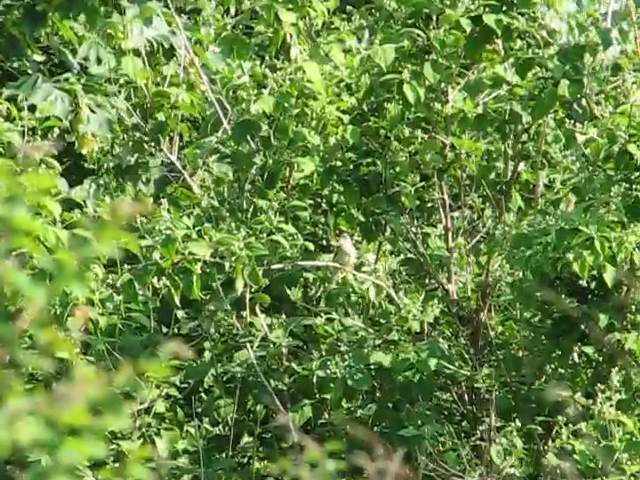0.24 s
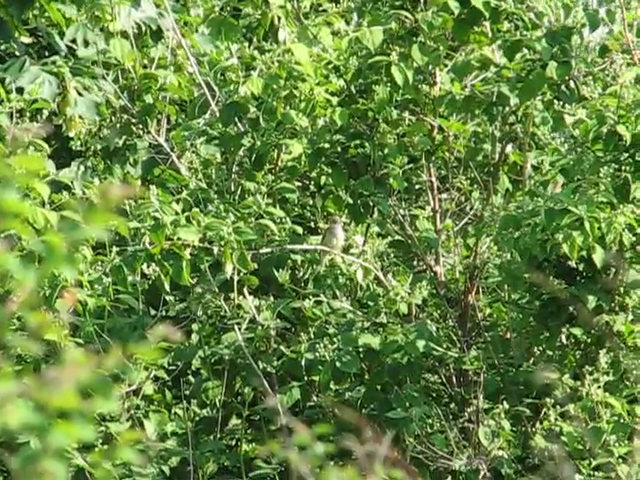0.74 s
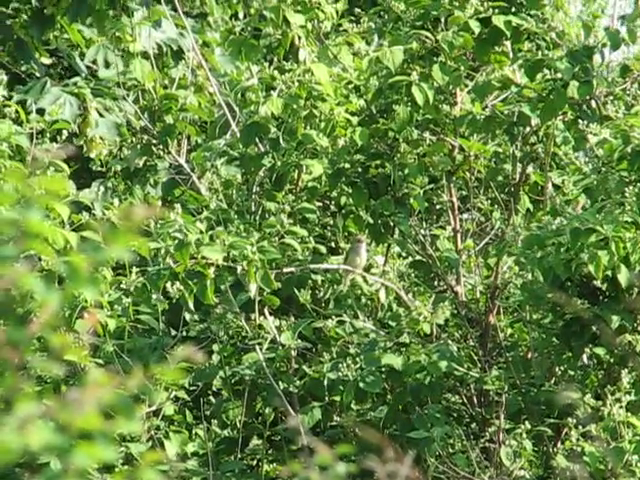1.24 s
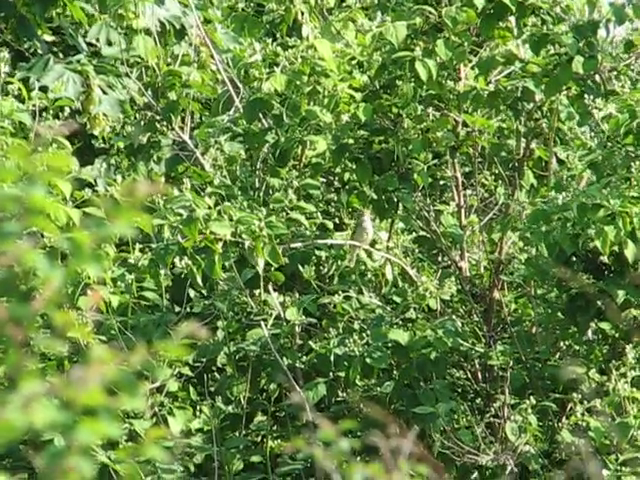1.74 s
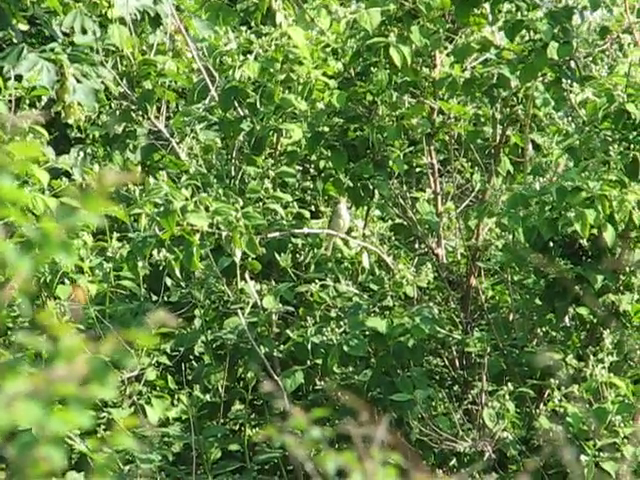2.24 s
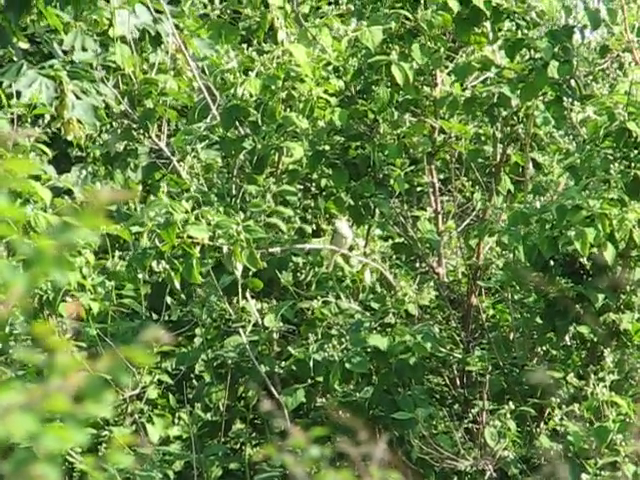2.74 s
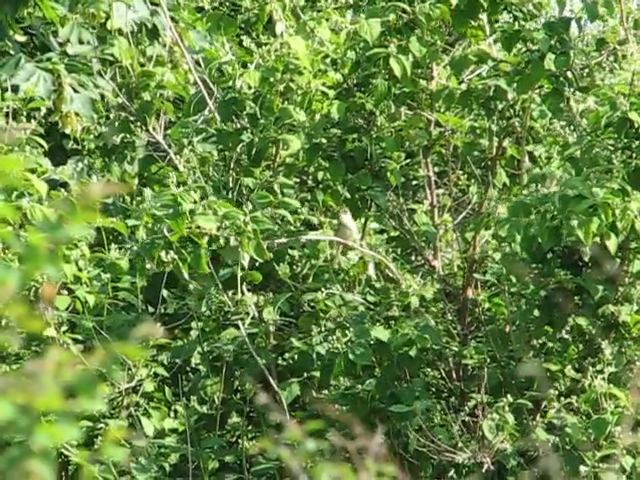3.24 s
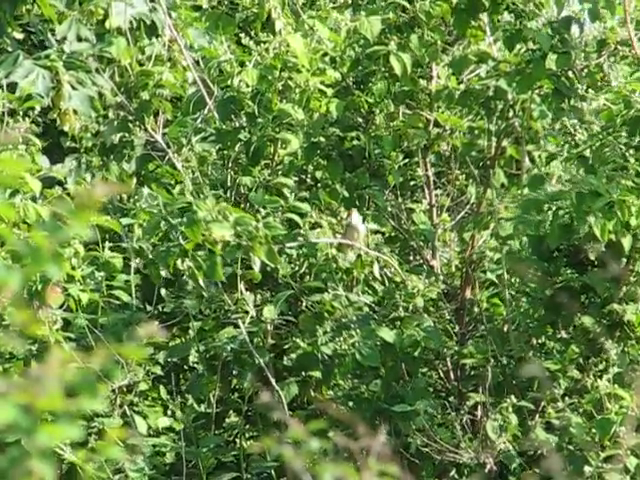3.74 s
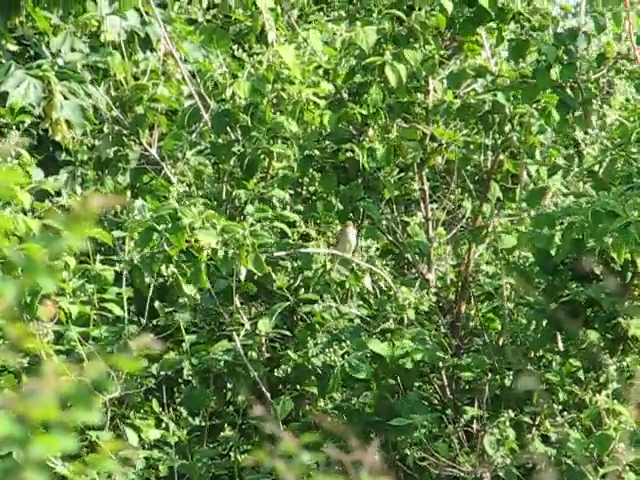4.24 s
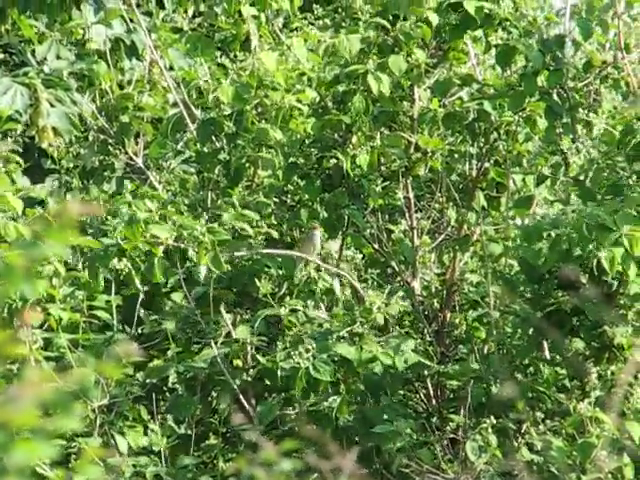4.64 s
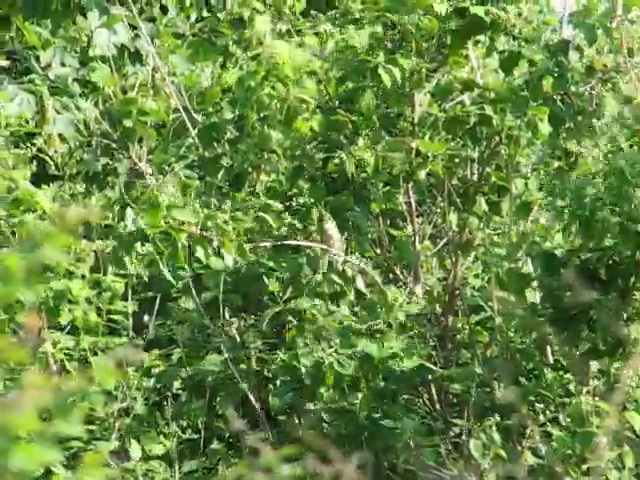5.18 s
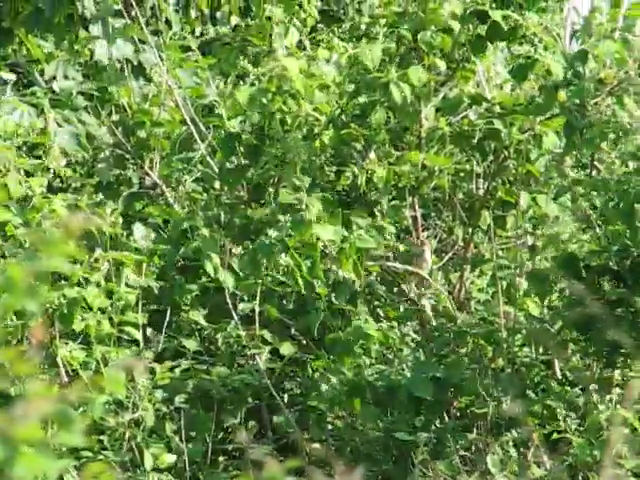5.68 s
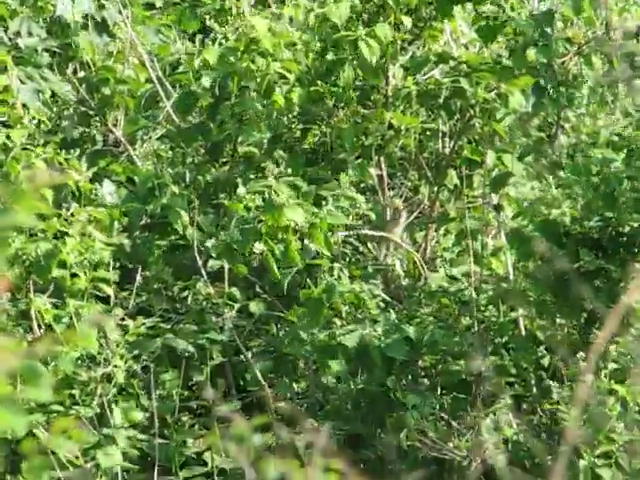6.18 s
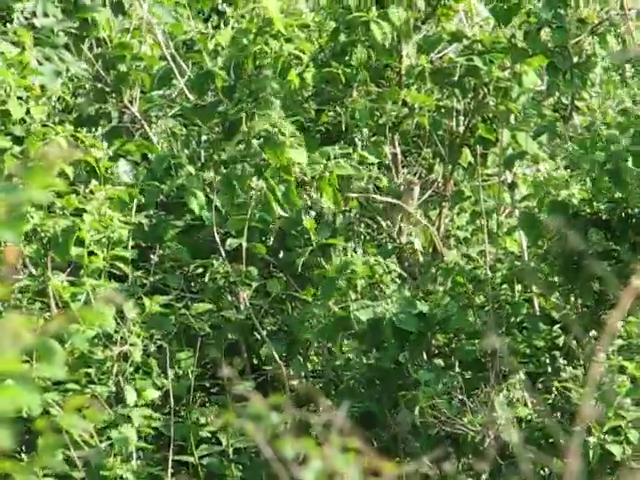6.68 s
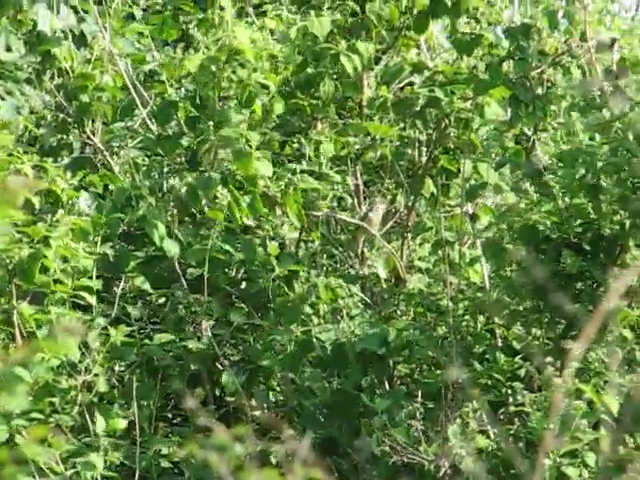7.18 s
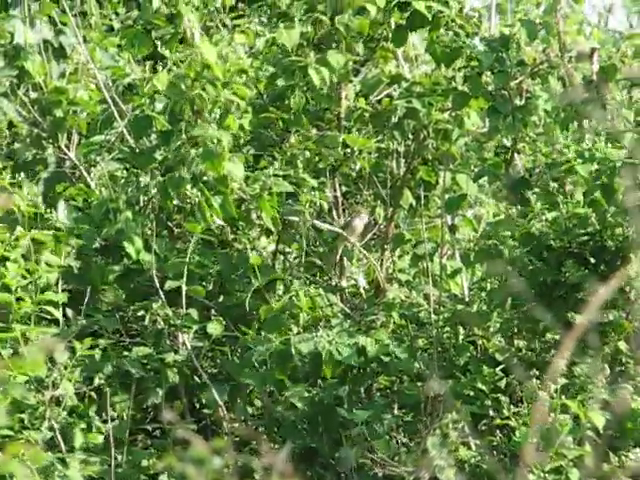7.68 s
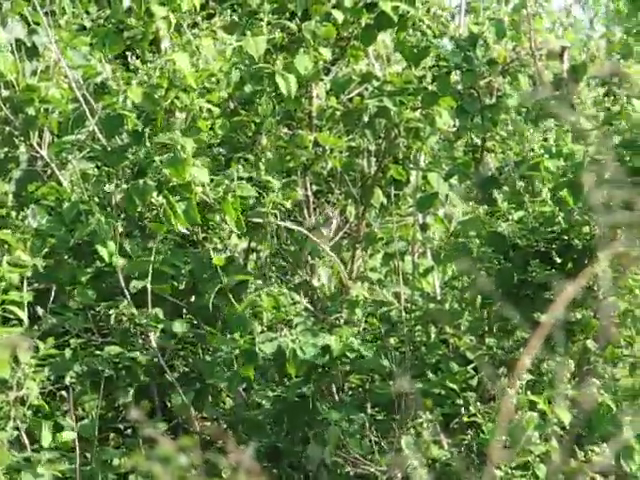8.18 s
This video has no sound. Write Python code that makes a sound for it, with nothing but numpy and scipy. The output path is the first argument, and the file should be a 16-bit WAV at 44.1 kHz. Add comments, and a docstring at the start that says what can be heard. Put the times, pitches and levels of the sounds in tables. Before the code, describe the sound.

In sunny shrubbery a small warbler sings close and clear, a hurried chain of whistled chips, then nasal chucks, sharp ticks, mews and buzzes, then repeated upswept hooks running into rattling trills, ending with hisses, wobbling whistles and piercing high notes. Another bird whistles faintly through leafy echoes. An open-air stereo microphone catches steady hush, low wind rumble, mostly on the right at first, and a thin electronic camera whine.

```python
"""A steady outdoor hush and a thin camera whine run throughout, with wind buffeting two microphone ports.
A near warbler opens with whistled chips and slurs while a second bird whistles farther off, mostly echo.
Then come nasal chucks, ticks, mews, buzzes, hooked glides, warbles and trills, and later hisses.
Whistles are jittered sines; nasal and rough notes are pulse trains and puffs through a moving throat
resonance. Random echoes stand for leaves; wind and hush are shaped noise; eddies are single pulses."""
import sys
import numpy as np
from scipy import signal
from scipy.fft import rfft, irfft
from scipy.io import wavfile
from scipy.ndimage import uniform_filter1d

SR = 44100
rng = np.random.default_rng(int(sys.argv[2]) if len(sys.argv) > 2 else 0)


def log_audio(samples):
    """Write samples as a 16-bit WAV file to the path given in sys.argv[1]."""
    # one column per channel
    frames = np.atleast_2d(samples).T
    # limit to full scale, then quantise
    limited = np.clip(frames, -1, 1)
    pcm = np.round(limited * 32767).astype(np.int16)
    wavfile.write(sys.argv[1], SR, pcm)


N = 371322
TIME = np.arange(N) / SR

# Background level over time. Each row: time in seconds, gain in dB.
BACKGROUND_LEVEL = [(0, 2), (1.4, 2.5), (1.65, -1), (2, 4), (3.65, 2.5), (3.9, -9), (4.5, -9.5),
                    (4.85, -16), (5.2, -8), (5.6, -2.5), (6, 2.5), (8.42, 3.5)]


def amp(db):
    """Decibels to gain."""
    return 10 ** (np.asarray(db) / 20)


def evened(x):
    """Scales to rms 1."""
    return x / np.sqrt(np.mean(x ** 2) + 1e-20)


def curve(rows, t):
    """Joins rows of (s, value) by straight lines."""
    return np.interp(t, *np.transpose(rows))


def spectrum(points, hz):
    """Joins rows of (Hz, value) on a log-frequency axis."""
    f, value = np.transpose(points)
    return np.interp(np.log(hz + 1), np.log(f), value)


def ease(u):
    """A smooth step from 0 to 1."""
    return np.sin(np.pi / 2 * np.clip(u, 0, 1)) ** 2


def wander(count, hz):
    """Smooth noise of about rms 1: Gaussian low-pass, down to 1/e in amplitude at hz."""
    f = np.fft.rfftfreq(count + 4096, 1 / SR)
    noise = rfft(rng.standard_normal(2 * len(f) - 2))
    return evened(irfft(noise * np.exp(-(f / hz) ** 2)))[:count]


def frames():
    """Times, frequencies and random short-time spectra (frames, bins) of a white noise."""
    hz, t, z = signal.stft(rng.standard_normal(N), SR, nperseg=1024, noverlap=768)
    return t[:, None], hz, z.T


def to_sound(z):
    """Short-time spectra back to a waveform."""
    return signal.istft(z.T, nperseg=1024, noverlap=768)[1][:N]


def resonate(x, hz, width):
    """A moving resonance: shift down to zero, smooth twice, shift back."""
    turn = np.exp(2j * np.pi * np.cumsum(hz) / SR)
    r = np.exp(-np.pi * width / SR)
    return (turn * signal.lfilter([(1 - r) ** 2], [1, -2 * r, r * r], x / turn)).real


def span(s, length):
    """Sample times of a note, and its progress from 0 to 1."""
    u = np.linspace(0, 1, round(length * SR))
    return s + u * length, u


def envelope(t, attack_s, release_s, depth_db):
    """Attack, hold and release of a note, in dB below its full level."""
    nearest_edge = np.minimum((t - t[0]) / attack_s, (t[-1] - t) / release_s)
    return depth_db * (np.clip(nearest_edge, 0, 1) - 1)


def gesture(rows):
    """Sample times of one note and its controls, with the corners rounded."""
    s, *columns = np.transpose(rows)
    t = np.arange(s.min() - .001, s.max() + .001, 1 / SR)
    lines = (np.interp(t, np.sort(s), c) for c in columns)
    return t, *(uniform_filter1d(line, size=130, mode="nearest") for line in lines)


def add(mix, t, sound):
    """Lays a note into the mix with short soft edges."""
    edge = np.clip(np.minimum(t - t[0], t[-1] - t) / 0.00033, 0, 1)
    part = mix[max(round(t[0] * SR), 0):][:len(t)]
    part += (sound * np.sin(np.pi / 2 * edge) ** 2)[:len(part)]


def whistle(hz, overtone_db=-27, jitter=0.014):
    """A nearly pure tone from the syrinx, with a weak octave."""
    phase = 2 * np.pi * np.cumsum(hz * (1 + jitter * wander(len(hz), 630))) / SR
    return evened(np.sin(phase) + amp(overtone_db) * np.sin(2 * phase))


def whistles(notes, overtone_db, rising_db=13, break_per_s=85):
    """Clean glides: quick rises bring out the octave, and the tone breaks where it leaps down."""
    out = np.zeros(N)
    for t, hz, db in notes:
        glide = np.gradient(np.log(hz), t)
        held = 1 / (1 + (np.maximum(-glide, 0) / break_per_s) ** 8)
        octave_db = overtone_db + rising_db * np.clip(glide / 35, 0, 1)
        add(out, t, amp(db) * held * whistle(hz, overtone_db=octave_db))
    return out


def voice(hz, throat_hz, width, jitter, rough, count, leak_db=-40):
    """Jittered syrinx pulses and puffs of air; the throat picks out the nearest overtones."""
    k = np.arange(1, count + 1)[:, None]
    phase = 2 * np.pi * np.cumsum(hz * (1 + jitter * wander(len(hz), 810))) / SR
    gains = 1 / (1 + (np.log(k * hz / throat_hz) / width) ** 2)
    # partials below the resonance leak out
    gains = gains + amp(leak_db) / (1 + (k * hz / throat_hz) ** 8)
    # a small beak radiates no bass
    gains = gains / np.sqrt(1 + (1950 / (k * hz)) ** 12)
    # phases quadratic in k make each pulse a short chirp
    pulses = (gains * np.cos(k * phase + 1.3 * k ** 2)).sum(0)
    pulses = pulses / np.sqrt((gains ** 2).sum(0) / 2)
    air = (1 + np.cos(phase)) * rng.standard_normal(len(hz))
    puffs = evened(resonate(air, throat_hz, 2 * width * throat_hz.mean()))
    rough = np.clip(rough, 0, 1)
    return np.sqrt(1 - rough) * pulses + np.sqrt(rough) * puffs


def voiced(notes, width, jitter, rough, count, leak_db):
    """Notes in which pitch and throat move separately."""
    out = np.zeros(N)
    for t, hz, throat_hz, db in notes:
        add(out, t, amp(db) * voice(hz, throat_hz, width, jitter, rough, count, leak_db))
    return out


def rasps(notes, pulse_hz, width, jitter, rough, count, leak_db):
    """Rough pulse trains whose rate arches a little while the throat moves."""
    out = np.zeros(N)
    for t, throat_hz, db in notes:
        arch = 1 - 0.13 * np.linspace(-1, 1, len(t)) ** 2
        add(out, t, amp(db) * voice(pulse_hz * arch, throat_hz, width, jitter, rough, count, leak_db))
    return out


def whine_high(hz=11800, db=-71, drift_hz=90):
    """A faint, wavering top note of the camera's whine."""
    pitch_hz = hz + drift_hz * wander(N, 2) + 120 * wander(N, 300)
    return amp(db + 3 * wander(N, 2)) * np.sin(2 * np.pi * np.cumsum(pitch_hz) / SR)


def background(hush_db=-38.0):
    """Outdoor hush, alike on both ports only in the bass, and whine: low notes lean right, the top left."""
    # Each row: frequency in Hz, relative spectral level in dB.
    hush_shape = [(30, 0), (150, 5), (500, 0), (950, 2.5), (1500, -2), (2200, -6), (4500, -9.5), (8000, -9),
                  (9300, -23), (12500, -24), (15700, -29.5)]
    # Each row: frequency in Hz, left-right likeness from 0 to 1.
    likeness = [(100, 1), (900, 0.84), (2000, 0.19), (5000, 0.044), (12000, 0.033)]
    # Each row: frequency in Hz, relative level in dB.
    whine_notes = [(7854, -57.5), (7881, -79), (7913, -82), (8253, -75), (8280, -60.5), (8312, -80)]
    (_, hz, left), (_, _, other) = frames(), frames()
    same = np.clip(spectrum(likeness, hz), -1, 1)
    ports = left, same * left + np.sqrt(1 - same ** 2) * other
    hush = evened(np.array([to_sound(z * amp(spectrum(hush_shape, hz))) for z in ports]))
    hush = hush * amp(hush_db + .5 * wander(N, 12.0))
    whine = np.zeros(N)
    for note_hz, db in whine_notes:
        whine += amp(db) * np.sin(2 * np.pi * np.cumsum(note_hz + 4 * wander(N, 44)) / SR)
    total = hush + whine * amp([[-2], [6]]) + whine_high() * amp([[2], [-4]])
    return total * amp(curve(BACKGROUND_LEVEL, TIME))


def blowing(breeze, side):
    """Relative wind level in dB on one port: the breeze, lifted by each passing gust."""
    # Each row: centre in seconds, 1/e half length in seconds, lift on the left in dB, on the right in dB.
    gusts = [(0.339, 0.028, -5, 12.5), (0.452, 0.028, -1, 8.5), (1.651, 0.019, 4, 7), (1.927, .04, 3, 1),
             (2.24, 0.022, 2, 6), (2.88, 0.019, 15, -4), (3.478, .03, 12, 6.5), (3.667, 0.059, 8, 2.5),
             (4.571, 0.023, 0, 5.5), (5.084, 0.069, 11, 6.5), (5.309, 0.048, 11.5, 2.5),
             (5.623, 0.009, 12.5, 2), (5.849, 0.021, 7.5, 8.5), (5.91, 0.023, 2, 11.5),
             (6.373, 0.024, 23, 3), (6.485, 0.015, 2, 12.5), (6.564, .02, 10, 4.5),
             (6.71, 0.045, -1.5, 9.5), (8.285, 0.063, -5, 10.5)]
    level = curve(breeze, TIME)
    for s, half_s, left_db, right_db in gusts:
        lift_db = right_db if side == "right" else left_db
        level = level + lift_db * np.exp(-((TIME - s) / half_s) ** 2)
    return level


def wind(level, corner_hz, low_hz, slope, brighten_db=62, lumps_db=3.5):
    """Turbulence on one port: harder gusts hold smaller eddies and reach higher."""
    t, hz, z = frames()
    above_background_db = np.interp(t, TIME, level) - curve(BACKGROUND_LEVEL, t)
    corner = corner_hz * 10 ** ((above_background_db + 15.0) / brighten_db)
    bass_cut = hz / np.hypot(hz, low_hz) * hz / np.hypot(hz, 24)
    shape = bass_cut / (1 + (hz / corner) ** 3) ** (slope / 6)
    rumble = evened(to_sound(z * shape / np.linalg.norm(shape, axis=1, keepdims=True)))
    rumble /= np.sqrt(uniform_filter1d(rumble ** 2, size=3500))
    return amp(level) * evened(rumble * amp(lumps_db * wander(N, 56.4)))


def wind_on_ports():
    """Separate turbulence on the left and right port."""
    # Breeze on each port. Each row: time in seconds, relative level in dB.
    breeze_left = [(0, -43), (1.4, -38.5), (1.9, -35), (2.7, -40), (3.6, -31.5), (3.9, -35), (4.55, -26),
                   (4.95, -39), (5.35, -22.5), (5.98, -21.5), (6.25, -37), (7.95, -50), (8.12, -25),
                   (8.42, -47)]
    breeze_right = [(0, -28), (1.03, -25.5), (1.45, -13.5), (2.0, -19.5), (2.6, -28.5), (3.0, -17),
                    (3.6, -18), (3.85, -10), (4.8, -13.5), (4.94, -25), (5.25, -25), (5.45, -31.5),
                    (5.72, -16), (6.24, -44), (6.68, -23.5), (7.52, -21), (7.87, -33.5), (8.42, -31.5)]
    left = wind(blowing(breeze_left, "left"), corner_hz=152, low_hz=35, slope=4.5)
    right = wind(blowing(breeze_right, "right"), corner_hz=197.6, low_hz=81.4, slope=5.59)
    return np.array([amp(0.2) * left, amp(0.38) * right])


def chip(s, climb_s, shoulder_s, turn_s, top_hz, db, tail_db, shoulder=.89,
         onset_db=-14, turn_db=-6, break_db=-10, fade_db=-7):
    """The pitch climbs, rounds its top, then breaks and leaps down to a falling tail."""
    start_hz, tail_hz, end_hz = 2600, 2700, 2003
    leap_s, tail_s = 0.00454, 0.015
    leap = s + turn_s
    tail = leap + leap_s
    return gesture([(s - shoulder_s - climb_s, start_hz, db + onset_db),
                    (s - shoulder_s, shoulder * top_hz, db),
                    (s, top_hz, db),
                    (leap, shoulder * top_hz, db + turn_db),
                    ((leap + tail) / 2, start_hz, tail_db + break_db),
                    (tail, tail_hz, tail_db),
                    (tail + tail_s, end_hz, tail_db + fade_db)])


def chips():
    """Whistled rises that break into a low tail."""
    # Each row: time of the top, climb, shoulder and turn in seconds, top pitch in Hz,
    # relative level in dB, relative tail level in dB.
    rows = [(0.012, .006, 0.0041, 0.0033, 4600, -39.5, -47),
            (0.218, 0.0045, .003, 0.0059, 3710, -33.5, -47), (0.757, .006, 0.0035, 0.0082, 4960, -32, -30),
            (0.852, 0.0062, 0.0036, 0.0073, 4370, -28, -33),
            (1.174, 0.0065, .005, .007, 4370, -29.5, -30.5),
            (1.264, 0.0075, .006, 0.0071, 4590, -28, -32.5),
            (1.458, 0.0083, 0.0067, 0.0047, 4460, -28.5, -35.5),
            (1.537, 0.0064, 0.0092, 0.0063, 4440, -28.5, -32),
            (1.725, 0.0052, .015, 0.011, 4350, -31.5, -35.5), (1.812, .013, 0.0088, .006, 4260, -26, -32.5),
            (1.906, .009, 0.0058, 0.0072, 4450, -23, -30), (2.013, .010, .005, 0.0077, 4400, -23.5, -36),
            (3.416, .008, 0.0074, .008, 4500, -25.5, -34.5), (3.864, .005, 0.0026, 0.004, 3790, -32.5, -60)]
    return whistles([chip(*row) for row in rows], overtone_db=-27)


def slur(s, length, start_hz, middle_hz, end_hz, db, fade_db):
    """One smooth bend of pitch; its ends lie fade_db below its middle."""
    t, u = span(s, length)
    off = (2 * u - 1) ** 2
    bend_hz = ((start_hz + end_hz) / 2 - middle_hz) * off
    return t, middle_hz + (end_hz - start_hz) * (u - .5) + bend_hz, db - fade_db * off


def shrubbery(x, t60, delay_s):
    """Leaves and twigs return many weak echoes, different at each port."""
    t = TIME[:SR // 2]
    strengths = rng.standard_normal((2, len(t)))
    present = rng.random((2, len(t))) < .1
    taps = strengths * present * (t > delay_s) * amp(-60 * t / t60)
    taps = taps / np.linalg.norm(taps, axis=1, keepdims=True)
    return signal.fftconvolve(x[None], taps, axes=1)[:, :N]


def far_bird(direct_db=-3, echo_db=7.5, flicker_db=3):
    """The distant whistler comes mostly as echo and flickers at random, as through moving leaves."""
    # Each row: start and length in seconds, start, middle and end pitch in Hz, relative level in dB.
    rows = [(0.133, 0.061, 3540, 3770, 3750, -47), (0.222, 0.076, 4170, 4280, 4380, -56),
            (0.303, 0.08, 4370, 4570, 5200, -54), (0.455, 0.034, 3600, 3480, 3400, -44),
            (0.554, .13, 3280, 3590, 3900, -55.5), (0.78, 0.029, 4170, 3970, 3970, -43.5),
            (0.882, 0.015, 3100, 3090, 3000, -36.5), (0.923, .075, 2940, 2790, 2620, -55.5),
            (1.037, .055, 2600, 2890, 2840, -49), (1.39, .05, 2380, 2470, 2600, -55),
            (1.559, 0.047, 2550, 2600, 2680, -52.5), (1.924, 0.039, 3840, 4180, 4220, -36),
            (5.075, 0.062, 3000, 3050, 3130, -66), (6.583, 0.069, 3395, 3873, 4090, -41),
            (6.854, 0.085, 3050, 2955, 2880, -45), (7.2, 0.21, 4170, 4680, 4450, -47),
            (7.502, 0.067, 3360, 3730, 3620, -48.5), (7.576, 0.068, 3370, 3280, 3170, -44),
            (7.841, .1, 3200, 3060, 2996, -48)]
    far = whistles([slur(*row, fade_db=-3) for row in rows], overtone_db=-40)
    far = far * amp(flicker_db * wander(N, 30))
    return amp(direct_db) * far + amp(echo_db) * shrubbery(far, t60=0.27, delay_s=0.0015)


def slurs():
    """Short slurred whistles, loudest in the middle."""
    # Each row: start and length in seconds, start, middle and end pitch in Hz, relative level in dB.
    rows = [(0.152, 0.0091, 3760, 3240, 2800, -32.5), (0.25, 0.021, 3530, 3060, 2880, -33.5),
            (0.522, 0.024, 3700, 3320, 2880, -37), (0.564, 0.028, 3500, 3150, 2820, -36),
            (3.440, 0.031, 2700, 3555, 2940, -22), (3.884, 0.021, 3620, 3073, 3250, -30.5),
            (3.908, .019, 3670, 3230, 2600, -40), (8.347, 0.012, 6870, 6300, 6150, -22),
            (8.364, 0.006, 6650, 5890, 4850, -8.5), (8.379, 0.0063, 6150, 5950, 4870, -12.5),
            (8.394, 0.0042, 5800, 5520, 4740, -7), (8.408, 0.0095, 6240, 6110, 5780, -9)]
    return whistles([slur(*row, fade_db=7.5) for row in rows], overtone_db=-28.5)


def chuck(s, length, end_hz, throat_hz, db, start_hz=625, closing=0.34):
    """The pitch rises while the throat resonance sinks toward it."""
    t, u = span(s, length)
    return (t, start_hz * (end_hz / start_hz) ** u, throat_hz * (1 - closing * (u - .5)),
            db + envelope(t, attack_s=0.01, release_s=0.0082, depth_db=15))


def chucks():
    """Rising nasal chucks: many overtones under a sinking throat resonance."""
    # Each row: start and length in seconds, end pitch in Hz, mid-note throat resonance in Hz,
    # relative level in dB.
    rows = [(2.386, 0.044, 1040, 3230, -29.5), (2.455, 0.038, 1125, 3300, -27),
            (2.525, 0.031, 1100, 3330, -27), (2.884, 0.045, 988, 3140, -29),
            (2.957, .037, 1006, 3000, -28.5), (3.03, 0.037, 1100, 3800, -27.5)]
    return voiced([chuck(*row) for row in rows],
                  width=0.19, jitter=0.014, rough=0.049, count=12, leak_db=-17)


def tick(s, throat_hz, db, length_s=0.021, snap_s=0.0038, start_ratio=0.65):
    """The throat snaps up to its resonance and the sound soon dies."""
    t, _ = span(s, length_s)
    return (t, throat_hz * curve([(s, start_ratio), (s + snap_s, 1)], t),
            db + envelope(t, attack_s=0.0028, release_s=.012, depth_db=17.5))


def ticks():
    """Mostly puffs of air through a throat that snaps up."""
    # Each row: start in seconds, throat resonance in Hz, relative level in dB.
    rows = [(2.621, 6460, -8), (3.116, 6836, -7.5), (7.208, 6580, -9), (7.567, 6500, -11),
            (7.964, 6500, -8)]
    return rasps([tick(*row) for row in rows],
                 pulse_hz=1270, width=0.13, jitter=0.052, rough=0.83, count=11, leak_db=-15.0)


def eddies(width_s=0.00098):
    """A single eddy gives one quick push and pull of pressure on the ports."""
    # Each row: time in seconds, relative level in dB, balance in dB (positive leans left).
    rows = [(3.271, 1.5, -30), (3.871, 2, -32), (4.583, 0.5, -31), (4.807, 2, -17), (5.064, -11, 15),
            (5.092, -3, -22), (5.293, -31, 8), (5.571, -12, -24)]
    u = np.linspace(-5, 5, round(10 * width_s * SR))
    out = np.zeros((2, N))
    push = -u * np.exp(1 - abs(u) * 1.47)
    for s, db, balance_db in rows:
        add(out[0], s + u * width_s, amp(db + min(balance_db, 0)) * push)
        add(out[1], s + u * width_s, amp(db - max(balance_db, 0)) * push)
    return out


def mew(s, length, top_hz, start_hz, end_hz, db, sag=.35):
    """An arch of pitch under an opening throat."""
    t, u = span(s, length)
    return (t, top_hz * (1 - sag * (2 * u - 1) ** 2), start_hz + (end_hz - start_hz) * u,
            db + envelope(t, attack_s=0.028, release_s=0.026, depth_db=11))


def mews():
    """Arched nasal mews: overtones picked out by a rising throat resonance."""
    # Each row: start and length in seconds, top pitch in Hz, throat resonance at start and end in Hz,
    # relative level in dB.
    rows = [(3.317, 0.062, 1546, 3270, 3800, -31), (3.768, 0.05, 1093, 3040, 3470, -33.5),
            (7.111, .052, 1976, 4260, 6140, -26.5)]
    return voiced([mew(*row) for row in rows],
                  width=0.15, jitter=0.017, rough=0.042, count=12, leak_db=-17.5)


def buzz(s, length, start_hz, end_hz, db, hold=0.25, fade_db=8):
    """The throat holds, then slides to its end resonance while the rasp fades."""
    t, u = span(s, length)
    slide = ease((u - hold) / (1 - hold))
    level = db - fade_db * slide + envelope(t, attack_s=.013, release_s=0.0061, depth_db=10.5)
    return t, start_hz + (end_hz - start_hz) * slide, level


def buzz_tail(s, length, start_hz, end_hz, db, begins=.42, fall=0.11, overtone=2.85):
    """A falling buzz clears into a nasal tone that sinks with the throat."""
    t, u = span(s + begins * length, (1 - begins) * length)
    throat_hz = end_hz * (1 + fall * (.7 - u ** 1.58))
    return t, throat_hz / overtone, throat_hz, db + envelope(t, attack_s=0.018, release_s=0.016, depth_db=8)


def buzzes():
    """Rough pulse trains under a sliding throat; the falling ones get a nasal tail."""
    # Each row: start and length in seconds, throat resonance at start and end in Hz, relative level in dB.
    rows = [(3.529, 0.081, 5650, 3366, -23), (3.978, .076, 5770, 3350, -35.5),
            (4.113, 0.064, 5200, 3300, -33), (4.227, .074, 5860, 3810, -33),
            (4.349, 0.054, 5800, 7100, -28)]
    rough = rasps([buzz(*row) for row in rows],
                  pulse_hz=455, width=0.18, jitter=0.027, rough=0.24, count=32, leak_db=-21)
    falling = [row for row in rows if row[3] < row[2]]
    tails = voiced([buzz_tail(*row) for row in falling],
                   width=0.11, jitter=0.025, rough=0.15, count=6, leak_db=-23)
    return amp(1.3) * rough + amp(-1) * tails


def hook(s, fall_s, rise_s, hold_s, low_hz, top_hz, low_db, top_db, start_ratio=1.29, lag=1.3,
         handover_db=4, droop_hz_per_s=12000, tuning=1.92):
    """The throat rides near the octave in the dip, takes over the fundamental as it rises; the top droops."""
    t, _ = span(s - fall_s, fall_s + rise_s + hold_s)
    dip_hz = low_hz * (1 + (start_ratio - 1) * np.clip((s - t) / fall_s, 0, 1) ** 2.1)
    u = np.clip((t - s) / rise_s, 0, 1)
    up = ease(u ** lag)
    hz = dip_hz + (top_hz - dip_hz) * up - droop_hz_per_s * np.maximum(t - s - rise_s, 0)
    throat_hz = tuning * dip_hz * (1 - ease(u)) + hz * ease(u)
    db = low_db + (top_db - low_db) * up - handover_db * np.sin(np.pi * u) ** 2
    return t, hz, throat_hz, db + envelope(t, attack_s=0.0068, release_s=0.0097, depth_db=15)


def hooks():
    """Hooked glides: a dip and a rise."""
    # Each row: time of the bottom, fall, rise and hold in seconds, bottom and top pitch in Hz,
    # relative bottom and top level in dB.
    rows = [(3.658, 0.0027, 0.02, 0.022, 2930, 6764, -25.5, -11),
            (4.75, .015, .032, 0.012, 3090, 5130, -30.5, -26.5),
            (5.162, .019, 0.035, .002, 2770, 5020, -31, -19.5),
            (5.58, 0.018, 0.039, 0.0023, 2820, 5530, -22.5, -14),
            (5.978, 0.019, .036, 0.0073, 2944, 5170, -15, -14),
            (6.41, .021, 0.04, .002, 2626, 4580, -17, -13.5),
            (6.810, 0.031, .036, 0.0029, 3246, 5300, -18.5, -13)]
    return voiced([hook(*row) for row in rows],
                  width=.15, jitter=0.008, rough=0.0039, count=5, leak_db=-17)


def warble(s, length, start_hz, end_hz, db):
    """The centre pitch falls steadily and the note fades over its last 34 ms."""
    t, u = span(s, length)
    level = db + envelope(t, attack_s=0.0033, release_s=0.034, depth_db=13.5)
    return t, start_hz * (end_hz / start_hz) ** u, level


def warbles(depth=0.145, lead_s=0.016, lead_from=.64, lead_db=-9):
    """A quick rise runs into a falling whistle whose vibrato speeds up."""
    # Each row: start and length in seconds, start and end pitch in Hz, relative level in dB.
    rows = [(4.385, .049, 4590, 2900, -31), (7.362, .07, 4030, 2126, -27.5),
            (7.732, .066, 3970, 2380, -24.5), (8.122, 0.079, 3510, 2090, -27)]
    out = np.zeros(N)
    for t, hz, db in (warble(*row) for row in rows):
        vibrato_hz = curve([(0, 52), (.02, 74), (.035, 100)], t - t[0])
        swing = -np.cos(2 * np.pi * np.cumsum(vibrato_hz) / SR)
        hz, db = hz * (1 + depth * swing), db + 2.3 * swing
        rise = np.linspace(1, 0, round(lead_s * SR))
        hz = np.r_[hz[0] * lead_from ** rise, hz]
        db = np.r_[db[0] + lead_db * rise, db]
        add(out, np.r_[t[0] - lead_s * rise, t], amp(db) * whistle(hz, jitter=0.025))
    return out


def tut(s, top_hz, throat_hz, db, length_s=.023, peak=0.404, sag=0.936, closing=0.24, fade_db=7):
    """A quick arch of pitch that fades as the throat closes."""
    t, u = span(s, length_s)
    return (t, top_hz * (1 - sag * (u - peak) ** 2), throat_hz * (1 - closing * u ** 1.34),
            db - fade_db * u ** 2 + envelope(t, attack_s=0.0046, release_s=0.00067, depth_db=12))


def tuts():
    """Short nasal tuts that open the trills."""
    # Each row: start in seconds, top pitch in Hz, starting throat resonance in Hz, relative level in dB.
    rows = [(4.53, 1510, 5240, -35.5), (4.849, 1485, 4500, -44), (5.269, 1555, 5250, -34.5),
            (5.677, 1570, 5080, -28.5), (6.09, 1495, 5300, -25.5), (6.527, 1376, 4200, -28),
            (6.948, 1443, 4340, -28.5)]
    return voiced([tut(*row) for row in rows],
                  width=0.18, jitter=0.008, rough=0.051, count=12, leak_db=-12)


def trills(period_s=.026, half_s=.0105, sag=0.316, fade_db=16, tuning=2.16, width=0.15, rough=0.022,
           uneven_db=1.5, uneven_pitch=0.0072):
    """Evenly spaced pitch arches, throat near the octave of the top; the closing one has its own pitch."""
    # Each row: first and last pulse in seconds, pitch at the start, at the end and of the closing pulse in Hz,
    # relative start and end level in dB.
    rows = [(4.563, 4.682, 1170, 1474, 1580, -50, -48), (4.885, 5.06, 1398, 1567, 1490, -40.5, -43.5),
            (5.305, 5.501, 1484, 1575, 1562, -36, -35), (5.716, 5.9, 1380, 1494, 1720, -29.5, -31),
            (6.129, 6.308, 1418, 1375, 1524, -23.5, -30.5), (6.564, 6.693, 1362, 1382, 1534, -27.5, -29),
            (6.987, 7.099, 1330, 1370, 1590, -30, -28.5)]
    out = np.zeros(N)
    t = np.arange(-half_s, half_s, 1 / SR)
    off = (t / half_s) ** 2
    for first, last, start_hz, end_hz, closing_hz, start_db, end_db in rows:
        u = np.linspace(0, 1, round((last - first) / period_s) + 1)
        chance = rng.standard_normal((len(u), 2))
        tops = np.where(u < 1, start_hz + (end_hz - start_hz) * u, closing_hz)
        tops = tops * (1 + uneven_pitch * chance[:, 0])
        levels = start_db + (end_db - start_db) * u + uneven_db * chance[:, 1]
        for s, hz, db in zip(first + (last - first) * u, tops, levels):
            throat_hz = np.full(len(t), tuning * hz)
            note = voice(hz * (1 - sag * off), throat_hz, width, jitter=0.019, rough=rough, count=3)
            add(out, s + t, amp(db - fade_db * off) * note)
    return out


def hiss(s, length, throat_hz, db, bend=0.11):
    """A swell of hiss whose resonance dips in the middle."""
    t, u = span(s, length)
    return (t, throat_hz * (1 + bend * (2 * u - 1) ** 2),
            db + envelope(t, attack_s=0.018, release_s=0.022, depth_db=12.5))


def hisses():
    """Strongly jittered pulses and air through a high throat resonance."""
    # Each row: start and length in seconds, mid-note throat resonance in Hz, relative level in dB.
    rows = [(7.324, 0.059, 5960, -20.5), (7.695, 0.055, 6400, -16), (8.075, .062, 6030, -15)]
    return rasps([hiss(*row) for row in rows],
                 pulse_hz=524, width=0.13, jitter=0.093, rough=0.31, count=18, leak_db=-19)


def dulled(x, edge_hz=8600, top_db=-11):
    """The microphone takes in less of the birds above its treble edge."""
    hz = np.fft.rfftfreq(N, 1 / SR)
    return irfft(rfft(x) * amp(top_db * (1 - 1 / (1 + (hz / edge_hz) ** 24))), N)


def birds():
    """The near warbler, mostly direct, and the far bird, mostly echo."""
    song = amp(3.0) * chips() + amp(1.5) * slurs()
    song += amp(2.5) * chucks() + amp(-4.5) * ticks()
    song += amp(6.5) * mews() + buzzes()
    song += amp(-1.0) * hooks() + amp(4.5) * warbles()
    song += amp(5.0) * tuts() + amp(2.5) * trills()
    song += amp(-2.0) * hisses()
    near = song * amp([[-.8], [-.3]])
    near = near + amp(-5.5) * shrubbery(song, t60=0.076, delay_s=.0006)
    near = near + amp(-11.5) * shrubbery(song, t60=0.31, delay_s=0.0094)
    return dulled(near + far_bird())


def scene():
    """Birds, background and wind at the two ports."""
    return birds() + background() + wind_on_ports() + eddies()


def record(dry, edge_hz=15750):
    """Peaks beyond full scale clip; then a low-pass limits the band."""
    low_pass = signal.firwin(511, edge_hz, window=("kaiser", 9), fs=SR)
    return signal.oaconvolve(np.clip(dry, -1, 1), low_pass[None], "same")


dry = scene()
out = record(dry)
log_audio(out)
```